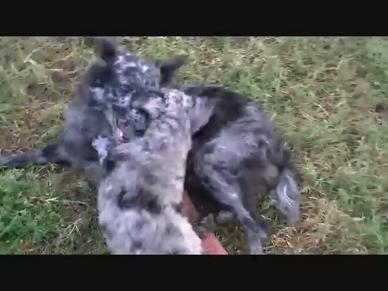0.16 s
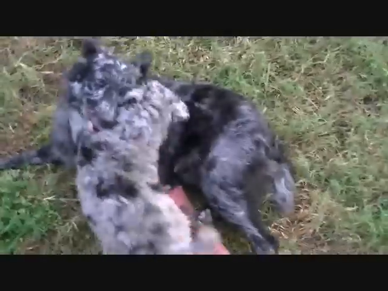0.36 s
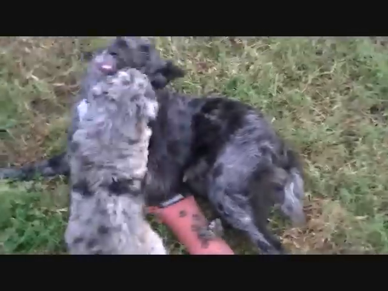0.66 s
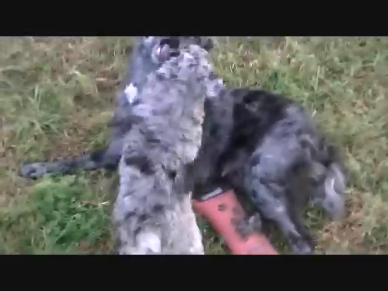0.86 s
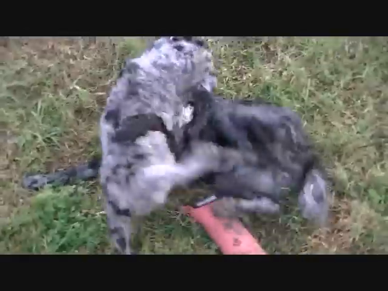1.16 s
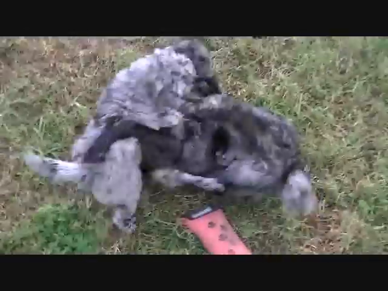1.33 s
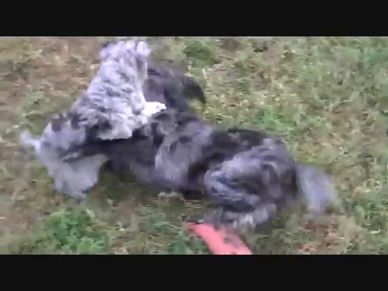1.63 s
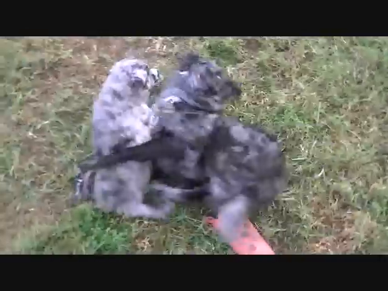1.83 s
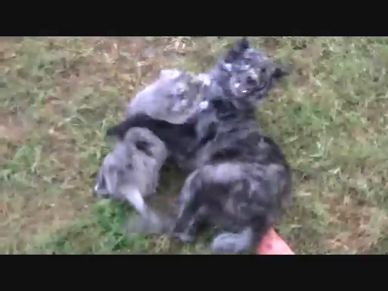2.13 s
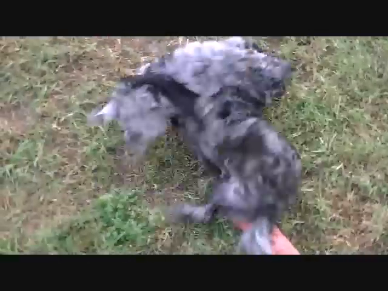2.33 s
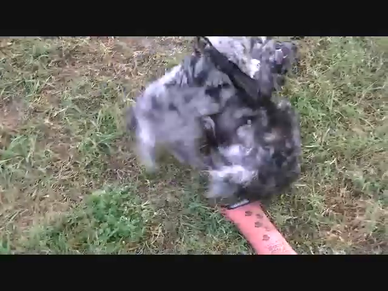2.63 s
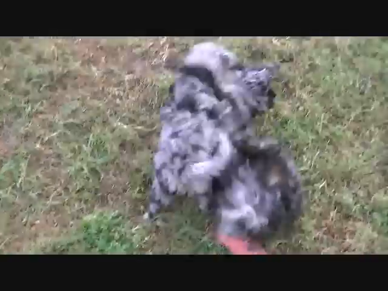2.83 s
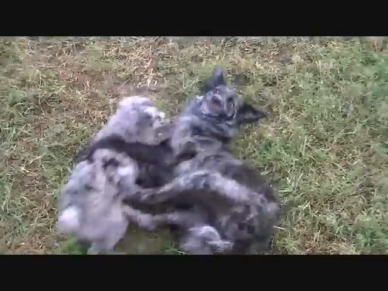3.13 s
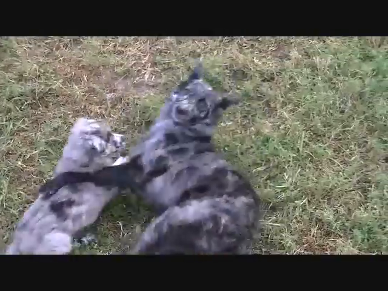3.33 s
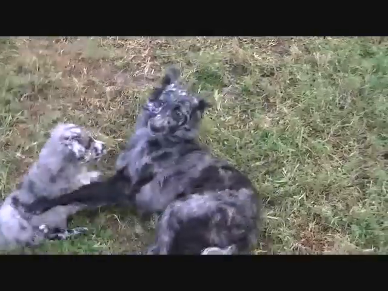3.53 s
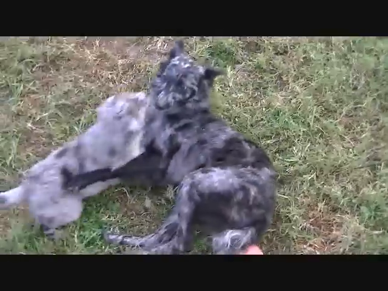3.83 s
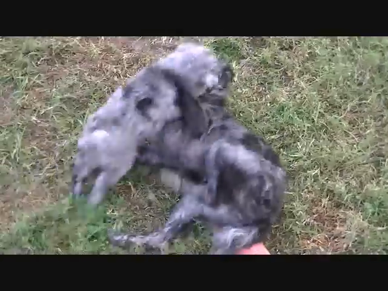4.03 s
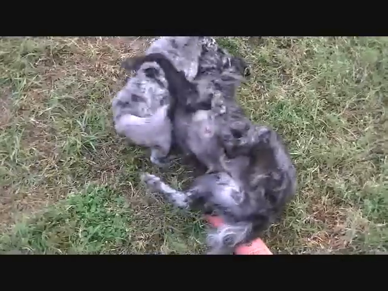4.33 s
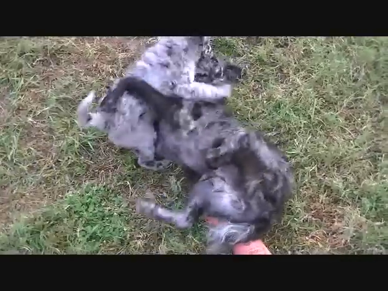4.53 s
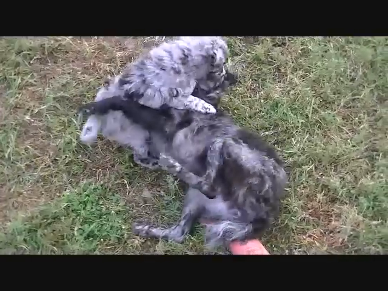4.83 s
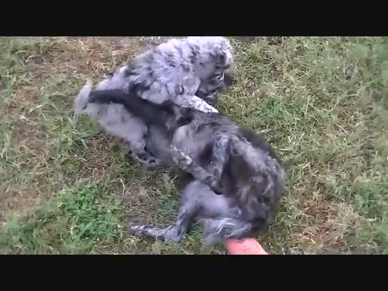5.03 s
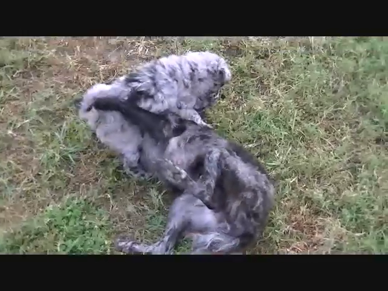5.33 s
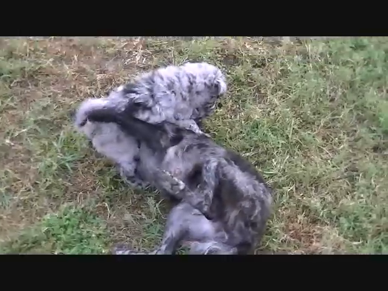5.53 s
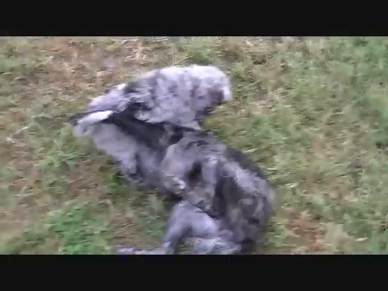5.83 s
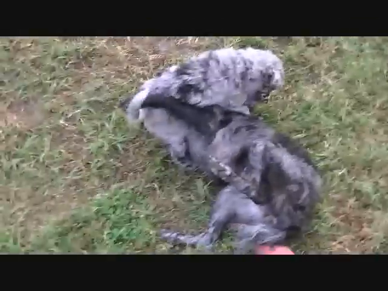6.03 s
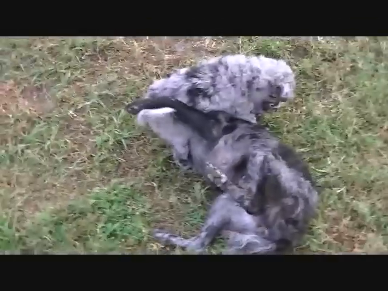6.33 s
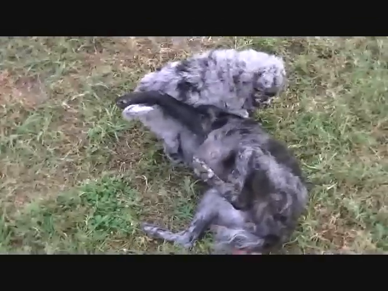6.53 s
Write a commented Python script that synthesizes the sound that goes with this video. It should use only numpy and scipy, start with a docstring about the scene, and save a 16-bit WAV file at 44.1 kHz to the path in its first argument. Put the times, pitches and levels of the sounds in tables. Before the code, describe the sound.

Close wet snorts and sniffs of playing dogs over rustling lawn, a few dry snaps, a faint distant engine hum, then a brief whine.

```python
"""A lawn, close by: a dog and her puppy wrestle. They snort and huff through nose and lips (breath noise
through moving resonances), rustle in dry grass (dense grains) and make a few sharp clicks (struck modes).
One grumbles softly and a short whine comes at the end (unsteady sines). A small engine hums far off
(harmonics of its firing rate) behind the soft open-air noise of the yard."""
import sys
import numpy as np
from scipy import signal
from scipy.fft import rfft, irfft
from scipy.io import wavfile
from scipy.ndimage import uniform_filter1d

SR = 44100
rng = np.random.default_rng(int(sys.argv[2]) if len(sys.argv) > 2 else 0)


def transcribe(u):
    """Save the signal u as a 16-bit wav file named by the first command-line argument.

    u: samples, shape (n,) or (channels, n), limited to [-1, 1]; the rate is SR.
    q: integer samples, one column per channel.
    """
    v = np.clip(np.atleast_2d(u).T, -1, 1)
    q = np.round(v * 32767).astype(np.int16)
    wavfile.write(sys.argv[1], SR, q)


N = 294147
TIME = np.arange(N) / SR


def from_db(db):
    """Decibels to gain."""
    return 10 ** (np.asarray(db) / 20)


def rms_one(x):
    """Scale to unit power."""
    return x / np.sqrt(np.mean(x ** 2) + 1e-20)


def in_time(rows):
    """Columns of a curve, interpolated at every sample."""
    time_s, *columns = np.transpose(rows)
    return [np.interp(TIME, time_s, column) for column in columns]


def band(x, low_hz, high_hz, order=2):
    """Butterworth band-pass."""
    edges_hz = np.clip([low_hz, max(high_hz, low_hz + 5)], [10, 15], [.44 * SR, .45 * SR])
    return signal.sosfilt(signal.butter(order, edges_hz, "band", fs=SR, output="sos"), x + 1e-18)


def resonance(x, hz, width_hz, order=1):
    """Fixed resonance, at unit power."""
    top_hz = np.hypot(hz, width_hz / 2) + width_hz / 2
    return rms_one(band(x, top_hz - width_hz, top_hz, order=order))


def gliding(x, hz, width_hz):
    """Resonance with a movable centre, at unit power: shift to 0 Hz, low-pass, shift back."""
    turn = np.exp(2j * np.pi * np.cumsum(hz) / SR)
    slow = signal.sosfilt(signal.butter(2, width_hz / 2, fs=SR, output="sos"), x / turn)
    return rms_one((slow * turn).real)


def coloured(x, spectrum):
    """Shape x with a smooth spectrum, at unit power."""
    hz, db = np.transpose(spectrum)
    bins_hz = np.maximum(np.arange(N + 1) * SR / (2 * N), 1)
    gain = from_db(np.interp(np.log(bins_hz), np.log(hz), db))
    return rms_one(irfft(rfft(x, 2 * N) * gain)[:N])


def drift(rate_hz):
    """Smooth random curve, RMS 1."""
    knots = rng.standard_normal(int(N / SR * rate_hz) + 2)
    return rms_one(np.interp(TIME * rate_hz, np.arange(len(knots)), knots))


def grains(per_s, spread_db):
    """Random clicks of very uneven, bounded size, at unit power."""
    size_db = spread_db * np.minimum(rng.exponential(1, N), 4)
    sizes = from_db(size_db) * rng.choice([-1, 1], N)
    return rms_one(sizes * (rng.random(N) < per_s / SR))


def swell(t, start, end, rise, fall):
    """Soft-edged gate, half open at start and end."""
    return (1 + np.tanh((t - start) / rise)) * (1 + np.tanh((end - t) / fall)) / 4


def tone_phase(hz, jitter):
    """Running phase of a slightly unsteady tone."""
    return 2 * np.pi * np.cumsum(hz * (1 + jitter * drift(220))) / SR


# open air: (frequency [Hz], relative density [dB per Hz])
YARD_SPECTRUM = [(30, -44), (55, -9), (75, -13), (120, 3), (155, -1), (200, -4.5), (290, -3.5), (450, -0.5),
                 (850, 2), (1700, -8.5), (2900, -7), (4200, -10), (9400, -29), (15000, -20)]
# far engine: (multiple of firing rate, relative level [dB])
ENGINE_LINES = [(2, -82.5), (4, -96), (5, -61), (6, -61), (7, -61), (8, -74.5), (10, -82), (12, -71.5)]
# far low drone: (time [s], level [dB])
DRONE_LEVEL = [(0, -74), (3, -77), (5, -79), (6.67, -63)]
ENGINE_HZ, DRONE_HZ = 27.95, 88.3


def yard(air_db=-52.24, engine_db=-1.0, waver_db=1.5, clatter_db=-59.0, clatter_hz=3300, clatter_width_hz=1900):
    """The far exhaust hums at multiples of its firing rate and rasps at each firing, over open-air noise."""
    drone_db, = in_time(DRONE_LEVEL)
    firing_phase = 2 * np.pi * np.cumsum(ENGINE_HZ * (1 + .002 * drift(3))) / SR
    hum = np.zeros(N)
    for multiple, db in ENGINE_LINES:
        # the silencer smears each firing: higher multiples arrive later
        phase = round(multiple) * firing_phase - .5 * multiple * multiple
        hum += from_db(db + waver_db * drift(3.69)) * np.sin(phase)
    drone = from_db(drone_db) * np.sin(tone_phase(DRONE_HZ, jitter=0.072))
    air = coloured(rng.standard_normal(N), YARD_SPECTRUM) * from_db(air_db + .5 * drift(11))
    rasp = rng.standard_normal(N) * (1 + np.cos(firing_phase))
    clatter = from_db(clatter_db) * resonance(rasp, clatter_hz, clatter_width_hz, order=2)
    return np.sqrt(2) * (from_db(engine_db) * hum + drone) + air + clatter


# bodies stirring in grass: (time [s], fur swish with still yard, relative [dB], blade treble, relative [dB])
RUSTLE = [(0.0, -47.5, -50.5), (0.65, -45.5, -48.5), (0.95, -50, -60.5), (1.74, -49.5, -49),
          (2.49, -49, -49), (3.12, -49.5, -60), (3.3, -50, -51), (3.6, -50, -51), (4.25, -50, -63),
          (4.59, -50.5, -91), (6.28, -50, -65), (6.67, -48.5, -44)]
# paw or flank raking the blades: (start [s], end [s], relative level [dB])
SCUFFS = [(0.018, 0.25, -60), (0.55, 0.68, -44), (0.83, 0.937, -48), (1.14, 1.48, -48.5),
          (1.72, 2.067, -49.5), (2.423, 2.536, -48.5), (2.697, 2.857, -51.5), (3.127, 3.413, -52.5),
          (3.66, 3.954, -66), (4.108, 4.293, -53.5), (6.49, 6.68, -50)]
# fur on grass: (frequency [Hz], relative density [dB per Hz])
SWISH_SPECTRUM = [(200, -21), (500, -20), (900, -4), (1600, -4.5), (2800, -9), (4200, -12.5), (7000, -18),
                  (12000, -36)]
# ticking blades: (frequency [Hz], relative density [dB per Hz])
CRACKLE_SPECTRUM = [(1500, -21), (3000, -4.5), (4500, -9), (6500, 1), (9500, 0), (12000, 4.5), (15000, -22)]
STILL_DB = -53  # still yard, taken out of the fur swish
SCUFF_ATTACK_S, SCUFF_RELEASE_S = 0.042, 0.046


def grass(swish_db=-.5, stir_db=-6.5, scuff_db=-3.0, scuff_swish_db=-6.5):
    """Fur brushes over the lawn; dry blades tick densely as they bend and spring back."""
    fur_db, blades_db = in_time(RUSTLE)
    fur = np.sqrt(np.maximum(from_db(fur_db) ** 2 - from_db(STILL_DB) ** 2, 0))
    scuff = np.zeros(N)
    for start_s, end_s, db in SCUFFS:
        scuff += from_db(db) * swell(TIME, start_s, end_s, SCUFF_ATTACK_S, SCUFF_RELEASE_S)
    swish = coloured(grains(per_s=6000, spread_db=2.5), SWISH_SPECTRUM) * from_db(1.74 * drift(70))
    crackle = coloured(grains(per_s=9000, spread_db=2.5), CRACKLE_SPECTRUM)
    crackle *= from_db(0.98 * drift(90) + 2.4 * drift(15))
    swish_gain = np.hypot(from_db(swish_db) * fur, from_db(scuff_swish_db) * scuff)
    crackle_gain = np.hypot(from_db(blades_db + stir_db), from_db(scuff_db) * scuff)
    return swish * swish_gain + crackle * crackle_gain


# dry snaps, as of stalks or teeth: (time [s], level [dB], time to -60 dB [s],
#   modes' low edge [Hz], modes' high edge [Hz], own ring [Hz], own ring relative to modes [dB])
SNAPS = [(0.732, -24.5, 0.015, 1400, 9500, 2370, -6), (0.9446, -33.5, 0.019, 2200, 13000, 2370, -1),
         (1.024, -43, 0.014, 1400, 3980, 2800, -10), (1.517, -39, 0.011, 4000, 13000, 12200, 3),
         (5.361, -38.5, 0.023, 1000, 6960, 3860, -6), (5.443, -48, 0.016, 5000, 13000, 11700, -2),
         (5.525, -46.5, 0.014, 3000, 9000, 7450, -18), (6.568, -42, 0.0092, 4000, 10000, 7500, -1)]
# modes shared by the snaps: (frequency [Hz], width [Hz], relative level [dB])
SNAP_MODES = [(1120, 460, 8.5), (1610, 350, 5), (2670, 350, 5.5), (3420, 240, 0), (3900, 380, 4),
              (5300, 470, 4.5), (6000, 280, 1.5), (6860, 340, -2), (7700, 560, 3), (9300, 680, -1.5),
              (13000, 2500, 6)]


def snaps(tail_db=-20, tail_s=0.053, splinter_db=-14, ring_s=0.023, ring_rise_s=0.001):
    """One break plus brief splintering excites short modes, with a clear ring and a faint tail."""
    out, count = np.zeros(N), 4410
    age_s = TIME[:count]
    for time_s, db, decay_s, low_hz, high_hz, ring_hz, ring_db in SNAPS:
        fade = from_db(-60 * age_s / decay_s) + from_db(tail_db - 60 * age_s / tail_s)
        crack = from_db(splinter_db) * rng.standard_normal(count) * fade
        crack[0] = 1
        modes = np.zeros(count)
        for k, (hz, width_hz, mode_db) in enumerate(SNAP_MODES):
            modes += (-1) ** k * from_db(mode_db) * resonance(crack, hz, width_hz)
        ring_fade = (1 - np.exp(-age_s / ring_rise_s)) * from_db(-60 * age_s / ring_s)
        ring = rms_one(np.sin(2 * np.pi * ring_hz * age_s) * ring_fade)
        snap = rms_one(band(modes, low_hz, high_hz, order=1)) + from_db(ring_db) * ring
        first = int(time_s * SR)
        # whole energy referred to 2 ms
        out[first:first + count] += from_db(db) * snap / np.sqrt(np.sum(snap ** 2) / (0.002 * SR))
    return out


# hard tick: (peak [dB], low edge [Hz], high edge [Hz])
TICK = (-9, 1130, 2060)
TICK_S = .0164


def tick(tail_db=-40, tail_s=0.041):
    """A hard, heavily damped knock, scattered faintly by the ground."""
    db, low_hz, high_hz = TICK
    tail = from_db(tail_db - 60 * np.abs(TIME - TICK_S) / tail_s)
    blow = (TIME > TICK_S) * rng.standard_normal(N) * tail
    blow[int(TICK_S * SR)] = 1
    knock = band(blow, low_hz, high_hz) + 0.068 * band(blow, 1900, 5200)
    return from_db(db) * knock / np.abs(knock).max()


# whine: (time [s], pitch [Hz], level [dB], second harmonic [dB], third harmonic [dB])
WHINE = [(6.494, 488, -53, -72, -78), (6.503, 494, -46, -66, -72), (6.516, 540, -38.5, -60, -66),
         (6.532, 557, -35, -51, -55), (6.556, 565, -37, -52, -56), (6.58, 554, -40, -52, -60),
         (6.592, 558, -43, -55, -66), (6.602, 517, -39, -44, -50), (6.62, 566, -42, -65, -59),
         (6.645, 564, -42, -50, -64), (6.67, 553, -47, -53, -64)]
# closed-mouth grumbles: (start [s], end [s], pitch [Hz], level [dB])
GRUMBLES = [(1.075, 1.18, 194.3, -49), (5.05, 5.195, 170.8, -50.5)]


def voices():
    """A nearly pure nasal whine that rises to a plateau, and low grumbles through a closed mouth."""
    hz, db, second_db, third_db = in_time(WHINE)
    phase = tone_phase(hz, jitter=.009)
    overtones = from_db(second_db) * np.sin(2 * phase) + from_db(third_db) * np.sin(3 * phase)
    # overtones waver more than the fundamental
    overtones *= from_db(2 * drift(140))
    whine = from_db(db) * np.sin(phase) + overtones
    out = whine * from_db(0.6 * drift(110)) * (TIME > WHINE[0][0])
    for start_s, end_s, pitch_hz, level_db in GRUMBLES:
        gate = swell(TIME, start_s, end_s, rise=0.014, fall=0.078)
        out += from_db(level_db) * np.sin(tone_phase(pitch_hz, jitter=0.047)) * gate
    return np.sqrt(2) * out


# hiss of the nose: (frequency [Hz], relative density [dB per Hz])
NOSE_SPECTRUM = [(1500, -10.5), (2800, -1), (3700, -8), (4600, 1.5), (7000, -2.5), (9500, -9), (12000, -1),
                 (15000, -35)]
# sniffs through the nose alone: (start [s], end [s], relative level [dB],
#   muzzle resonance [Hz], upper resonance [Hz])
SNIFFS = [(0.075, 0.182, -49, 1600, 2770), (0.35, 0.503, -55, 1670, 2720), (1.225, 1.34, -44.5, 1730, 2650),
          (2.394, 2.44, -49.5, 2280, 2940), (3.342, 3.4, -50, 2300, 2880)]
SNIFF_EDGE_S = 0.038


def sniffs(muzzle_db=-1.0, upper_db=-1.0, hiss_db=0.0):
    """Smooth air swells through the nose and tails off, with two resonances in the muzzle."""
    air = rng.standard_normal(N)
    hiss = from_db(hiss_db) * coloured(rng.standard_normal(N), NOSE_SPECTRUM)
    out = np.zeros(N)
    for start_s, end_s, db, muzzle_hz, upper_hz in SNIFFS:
        muzzle = from_db(muzzle_db) * resonance(air, muzzle_hz, 290, order=2)
        upper = from_db(upper_db) * resonance(air, upper_hz, 470, order=2)
        gate = swell(TIME, start_s, end_s, SNIFF_EDGE_S, 1.6 * SNIFF_EDGE_S)
        out += from_db(db) * (hiss + muzzle + upper) * gate
    return out


# narrowed nostril: (start [s], end [s], level [dB], start pitch [Hz], end pitch [Hz], width [Hz])
NOSTRILS = [(0.085, 0.17, -54.5, 4300, 4450, 400), (1.23, 1.315, -45.5, 4500, 4100, 520),
            (1.61, 1.69, -51.5, 5300, 6100, 1300), (1.875, 1.93, -54, 5600, 5600, 450),
            (1.937, 1.99, -42, 5600, 4870, 1250), (1.997, 2.02, -49, 5500, 5730, 700),
            (2.18, 2.248, -46, 4560, 4500, 1100), (2.238, 2.29, -43.5, 6170, 6750, 1700),
            (2.525, 2.555, -49, 7150, 6850, 650), (2.527, 2.55, -52, 5100, 5000, 600),
            (2.563, 2.609, -46, 4730, 4550, 700), (2.853, 2.967, -51.5, 4100, 4270, 700),
            (3.23, 3.305, -52, 2700, 3380, 800), (3.2, 3.292, -55, 5650, 5800, 550),
            (4.39, 4.458, -53, 4450, 4550, 600)]
NOSTRIL_EDGE_S = .012


def nostrils(flutter_db=2.5):
    """Air through a narrowed nostril rings at a pitch that slides as the nostril moves."""
    out, air = np.zeros(N), rng.standard_normal(N) * from_db(flutter_db * drift(160))
    for start_s, end_s, db, start_hz, end_hz, width_hz in NOSTRILS:
        span = slice(max(int((start_s - .06) * SR), 0), int((end_s + .06) * SR))
        hz = np.interp(TIME[span], [start_s, end_s], [start_hz, end_hz])
        gate = swell(TIME[span], start_s, end_s, NOSTRIL_EDGE_S, NOSTRIL_EDGE_S)
        out[span] += from_db(db) * gliding(air[span], hz, width_hz) * gate
    return out


# muzzle cavities: (frequency [Hz], width [Hz]); a snort moves all but the widths
THROAT, JOWLS, MOUTH, UPPER_LIP = (244, 113), (645, 137), (1190, 303), (2590, 710)
# hardest slaps of lips and jowls: (time [s], relative peak [dB], ring [Hz], mouth-and-jowl ring [dB])
LIP_SLAPS = [(1.093, -34, 1680, -4), (1.646, -25.5, 600, 1), (1.656, -25.5, 1550, -2),
             (1.863, -28.5, 1400, -14), (1.874, -29, 1200, -14), (1.896, -29, 1550, -16),
             (1.903, -21, 1530, -22), (1.909, -20, 1540, -17), (1.919, -23, 1110, -18),
             (1.943, -24, 1170, -19), (1.956, -22, 1940, -5), (1.9605, -23.5, 1960, -5),
             (1.965, -33, 2000, -5), (1.972, -24, 1150, -14), (1.978, -24.5, 1120, -14),
             (1.984, -25.5, 1930, 1), (1.993, -29, 1930, -6), (2.165, -36, 600, -12),
             (2.197, -23.5, 2700, 4), (2.204, -18, 2520, -4), (2.221, -23, 584, -5), (2.232, -30, 616, 0),
             (2.238, -30, 1080, 0), (2.25, -31, 1100, -4), (2.266, -24, 990, -5), (2.27, -24.5, 2280, -4),
             (2.282, -25, 2240, -13), (2.3045, -25, 2240, -9), (2.3165, -24, 2230, -12),
             (2.333, -22, 2280, -6), (2.348, -22.5, 2170, -22), (2.5155, -26, 1600, 8),
             (2.521, -29, 1630, 0), (2.531, -23, 1650, -3), (2.54, -24.5, 2450, -2),
             (2.5465, -18, 1390, -3.5), (2.5505, -19.5, 1600, -3), (2.5642, -20, 1130, -4),
             (2.571, -24, 1630, -6), (2.578, -26, 1190, -8), (2.764, -30, 1010, -2), (2.7905, -27, 690, 0),
             (2.821, -31, 1060, -8), (2.839, -27.5, 1090, 3), (2.855, -25, 1090, -2), (2.877, -32, 680, -3),
             (2.935, -26.5, 1200, -12), (2.9635, -30.5, 2150, -12), (3.177, -36, 1650, -2),
             (3.196, -32.5, 1060, -9), (3.215, -32, 1600, -8), (3.229, -28, 1650, -11),
             (3.237, -23, 1660, -2), (3.252, -25, 1230, 4), (3.301, -31, 1700, 0), (4.146, -33, 680, -14),
             (4.159, -28.5, 765, -12), (4.166, -30, 665, -11), (4.1795, -29.5, 1690, 9),
             (4.302, -23.5, 1270, 1), (4.319, -26.5, 1320, -3), (4.394, -33, 1130, -10),
             (4.401, -33, 1200, -10), (4.419, -36, 1250, -10), (4.4265, -30, 1150, -10)]


def lip_slaps(level_db=-4.5, wet_db=-15, gush_db=-20, gush_s=0.025, width_share=0.25, rebound=0.44, rebound_s=0.003):
    """Lips burst open and rebound once: a cavity, mouth and jowls ring, with a wet edge and a gush of air."""
    out, count = np.zeros(N), 2205
    for time_s, db, hz, hollow_db in LIP_SLAPS:
        blow = rng.standard_normal(count) * from_db(gush_db - 60 * TIME[:count] / gush_s)
        blow[0] = 1
        blow[int(rebound_s * rng.uniform(.5, 2) * SR)] += rebound
        cavity = resonance(blow, hz, width_share * hz, order=2)
        hollow = rms_one(resonance(blow, *JOWLS, order=2) + resonance(blow, *MOUTH, order=2))
        wet = rms_one(band(blow, 330, 3400))
        slap = cavity + from_db(hollow_db) * hollow + from_db(wet_db) * wet
        first = int(time_s * SR) - 44  # starts 1 ms early
        out[first:first + count] += from_db(db + level_db) * slap / np.abs(slap).max()
    return out


def lips_open(shut_share=0.34):
    """Share of the breath that gets out: lips hold it back briefly, mostly before each hard slap."""
    shut, count = np.zeros(N), 400
    for time_s, *_ in LIP_SLAPS:
        first = int(time_s * SR) - 3 * count // 4
        shut[first:first + count] += np.hanning(count)
    return 1 - np.clip(shut_share * shut, 0, 1)


def flaps(rate_hz, jitter, open_s, uneven_db):
    """Loose lips and palate slap open at uneven intervals: the slaps, and the gush of air after each."""
    gaps_s = np.exp(jitter * rng.standard_normal(1500)) / rate_hz
    at = np.cumsum(gaps_s * SR).astype(int)
    at = at[at < N]
    slaps = np.zeros(N)
    slaps[at] = from_db(uneven_db * rng.uniform(-1, 1, 1500)[:len(at)])
    gush = signal.lfilter([1], [1, -np.exp(-1 / (open_s * SR))], slaps + 1e-18)
    return rms_one(slaps), rms_one(gush)


SNORT_ATTACK_S, SMOOTH_ATTACK_S, SNORT_RELEASE_S, SNORT_SAG_DB = 0.014, 0.03, 0.023, -0.5


def snort_shape(t, start, end, flutter):
    """Attack, slower with less flutter; a hold that sags slightly at its middle; release."""
    off_centre = np.clip((2 * t - start - end) / (end - start), -1, 1)
    attack_s = SNORT_ATTACK_S + SMOOTH_ATTACK_S * (1 - flutter) ** 2
    hold = from_db(SNORT_SAG_DB * (2.0 - off_centre ** 2))
    return swell(t, start, end, attack_s, SNORT_RELEASE_S) * hold


# snorts: (start [s], end [s], flutter [0-1], breath [dB], throat [dB], jowls relative to breath [dB],
#   lip opening relative to breath [dB], lip start [Hz], lip end [Hz], nostril hiss [dB])
SNORTS = [(0.602, 0.622, 0.6, -46.5, -48, -5, 3, 1720, 1700, -39),
          (1.071, 1.184, 0.6, -53, -58, 1.5, 2.5, 1700, 1550, -55),
          (1.596, 1.696, 0.28, -50, -50, 3.5, 3, 1540, 1660, -45.5),
          (1.868, 1.923, 0.46, -37.5, -43, -23, -2, 1560, 1680, -44),
          (1.932, 2.008, 0.43, -44, -42.5, -5, 4, 2080, 1920, -41),
          (2.166, 2.235, 0.45, -45.5, -47, 1.5, 1.5, 2480, 2680, -44.5),
          (2.215, 2.29, 0.4, -45.5, -50, -1, 1.5, 2310, 2230, -41.5),
          (2.302, 2.363, 0.38, -46.5, -47, 1, 5.5, 2280, 2120, -50),
          (2.517, 2.561, 0.45, -41, -46, -1, 5, 1650, 1700, -43),
          (2.558, 2.597, 0.53, -40.5, -45, -5, 4, 1590, 1790, -44.5),
          (2.759, 2.895, 0.4, -45.5, -49.5, -2, 0.5, 1640, 1580, -48.5),
          (2.894, 2.97, 0.3, -42.5, -45.5, -4, 0.5, 1590, 2020, -48.5),
          (3.19, 3.297, 0.47, -46.5, -47.5, -6, 1, 1640, 1600, -53),
          (3.295, 3.364, 0.4, -48, -47.5, 0, -1, 1700, 1900, -62),
          (3.619, 3.66, 0.57, -43.5, -46.5, -15, -7, 1650, 1620, -53),
          (4.156, 4.204, .6, -56.5, -50.5, -5, 9, 1720, 1620, -52),
          (4.281, 4.354, 0.45, -43.5, -47.5, -6, -4.5, 1590, 1440, -54),
          (4.383, 4.46, 0.4, -45.5, -49, -2.5, -12, 1550, 1490, -63),
          (4.707, 4.872, 0.3, -52, -57.5, -7, -6, 1620, 1750, -59),
          (6.605, 6.617, .5, -45, -54, -1, -4, 1560, 1600, -62)]
THROAT_RISE_HZ_PER_DB, ORDINARY_THROAT_DB = 5.5, -47
NOSE_LAG_S = 0.01
UPPER_LIP_PULL = 0.28  # exponent: upper lip mode follows the lower


def snorts(slap_share=0.86, leak=0.53, lip_width_hz=356, mouth_pull=0.32, nose_chop=0.77):
    """Turbulent breath, chopped by the flapping lips, sounds the cavities of the muzzle."""
    slaps, gush = flaps(rate_hz=95, jitter=.3, open_s=.0036, uneven_db=2.5)
    smooth = rng.standard_normal(N)
    chopped = rms_one(gush * rng.standard_normal(N) + slap_share * slaps)
    # steady push of the lungs: even out the power over 18 ms
    chopped = chopped / np.sqrt(uniform_filter1d(chopped ** 2, size=800) + 1e-6)
    hiss = coloured(rng.standard_normal(N), NOSE_SPECTRUM)
    out, passing = np.zeros(N), lips_open()
    for (start_s, end_s, flutter, breath_db, throat_db, jowl_db,
         opening_db, lip_start_hz, lip_end_hz, nostril_db) in SNORTS:
        span = slice(max(int((start_s - .1) * SR), 0), int((end_s + .12) * SR))
        t = TIME[span]
        flutter = np.clip(flutter, 0, 1)
        air = np.sqrt(1 - flutter) * smooth[span] + np.sqrt(flutter) * chopped[span]
        air = air * passing[span]
        # lips drawn back raise both lip modes and lower mouth and jowls a little
        lip_hz = np.interp(t, [start_s, end_s], [lip_start_hz, lip_end_hz])
        lowering = (1700 / lip_hz) ** mouth_pull
        upper_hz = UPPER_LIP[0] * (lip_hz / 1700) ** UPPER_LIP_PULL
        mouth = gliding(air, MOUTH[0] * lowering, MOUTH[1])
        lips = gliding(air, lip_hz, lip_width_hz) + leak * gliding(air, upper_hz, UPPER_LIP[1])
        jowls = gliding(air, JOWLS[0] * lowering, JOWLS[1])
        puff = from_db(breath_db) * (mouth + from_db(jowl_db) * jowls + from_db(opening_db) * lips)
        # a throat pushed harder tightens and rings higher
        throat_hz = THROAT[0] + THROAT_RISE_HZ_PER_DB * max(throat_db - ORDINARY_THROAT_DB, 0)
        puff += from_db(throat_db) * resonance(air, throat_hz, THROAT[1], order=2)
        nose = from_db(nostril_db) * hiss[span] * (1 + nose_chop * flutter * (gush[span] - 1))
        out[span] += puff * snort_shape(t, start_s, end_s, flutter)
        out[span] += nose * snort_shape(t - NOSE_LAG_S, start_s, end_s, flutter)
    return out


def scene():
    """Sum of all sources, outdoors and so dry."""
    background = yard() + grass() + snaps() + tick()
    return (background + voices() + sniffs() + nostrils() + lip_slaps() + snorts())[None]


MIC_STEP_HZ, CUTOFF_HZ = 10100, 15200


def record(dry, top_db=-14):
    """The small microphone loses the deep bass, steps its top down and cuts off steeply above that."""
    thin = signal.sosfilt(signal.butter(2, 45, "high", fs=SR, output="sos"), dry)
    hz = np.arange(N + 1) * SR / (2 * N)
    step = from_db(top_db * np.clip((hz - MIC_STEP_HZ) / 600, 0, 1))
    dull = irfft(rfft(thin, 2 * N) * step)[:, :N]
    return signal.sosfilt(signal.ellip(10, .1, 80, CUTOFF_HZ, fs=SR, output="sos"), dull)


dry = scene()
out = record(dry)
transcribe(out)
```